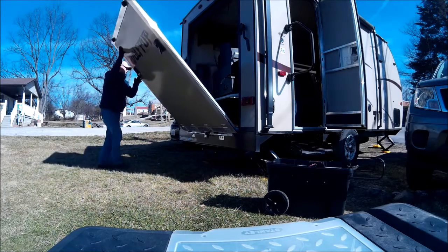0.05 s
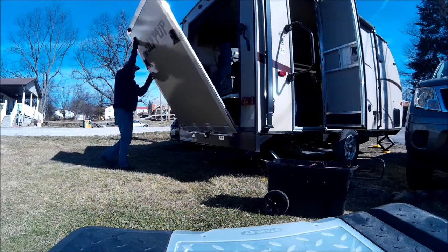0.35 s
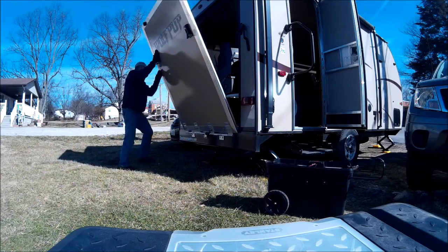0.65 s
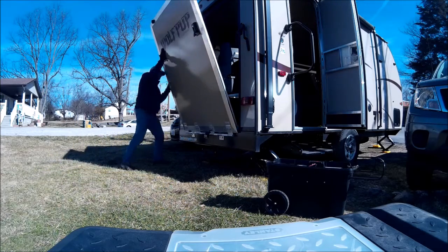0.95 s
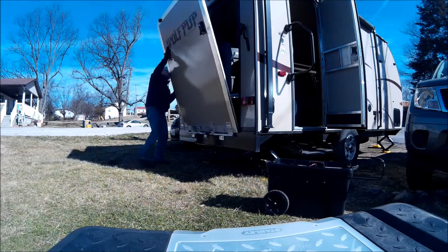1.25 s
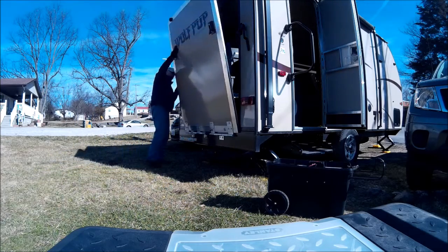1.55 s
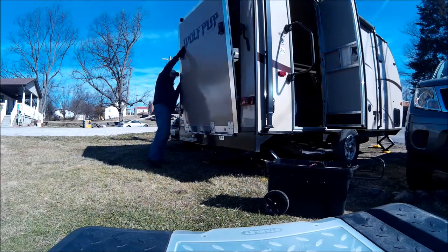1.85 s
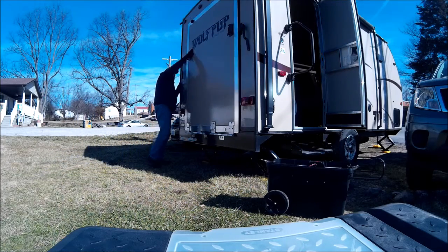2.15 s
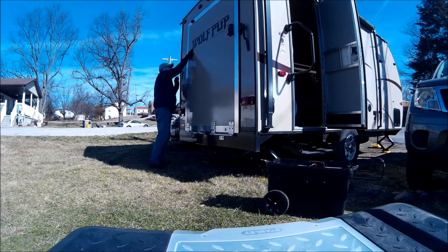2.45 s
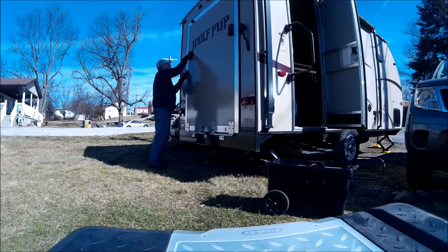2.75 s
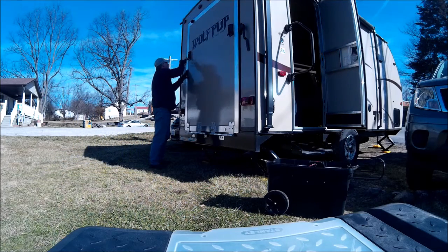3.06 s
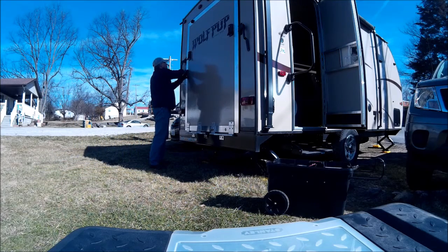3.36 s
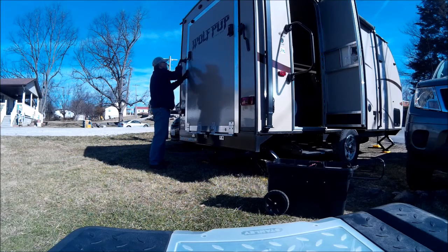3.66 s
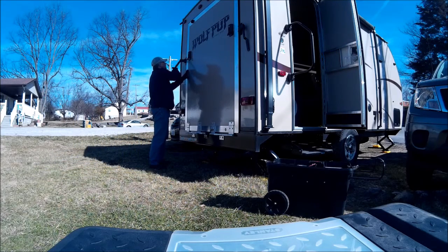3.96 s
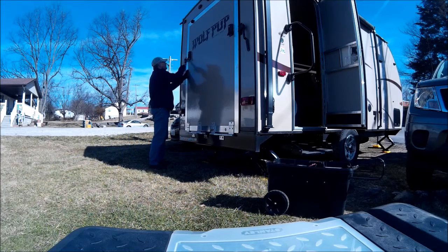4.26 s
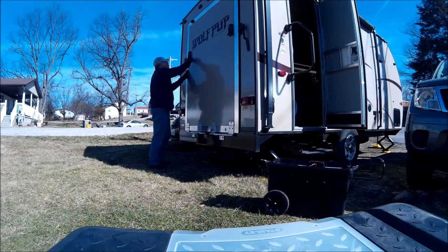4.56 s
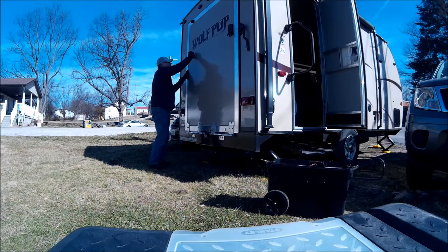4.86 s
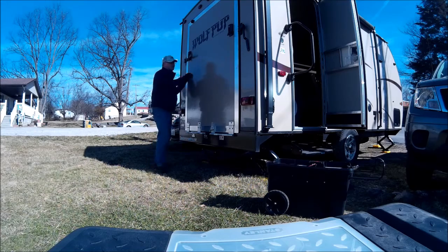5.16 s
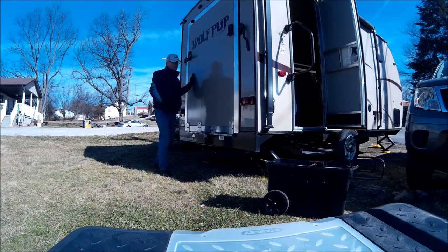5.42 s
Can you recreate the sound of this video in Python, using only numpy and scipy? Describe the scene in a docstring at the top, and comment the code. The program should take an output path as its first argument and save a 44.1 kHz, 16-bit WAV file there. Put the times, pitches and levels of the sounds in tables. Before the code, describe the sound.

Outdoors, a hinge pops, a heavy ramp door thuds shut, and after a few soft knocks a metal latch slams home.

```python
"""A faint distant rumble, then a hinge pops: on a lawn, a few metres from the microphone, a man is
pushing a travel trailer's rear ramp door shut. The hinge slips as the ramp rises. The ramp lands in
its frame, booming the hollow body, and rocks to rest while loose steel rattles. He knocks the latch
into place by hand, and its bar snaps over centre and slams home. The yard returns a scattered echo."""
import sys
import numpy as np
from scipy import signal
from scipy.fft import rfft, irfft
from scipy.io import wavfile

SR = 44100
rng = np.random.default_rng(int(sys.argv[2]) if len(sys.argv) > 2 else 0)


def store_pcm(level_fs):
    """Save levels as 16-bit WAV."""
    pcm = np.round(np.clip(level_fs, -1, 1) * 32767).astype(np.int16)
    wavfile.write(sys.argv[1], SR, np.atleast_2d(pcm).T)


N = 246519
RING_S = np.arange(int(.6 * SR)) / SR   # time axis of one ring
EDGES_HZ = np.geomspace(24, 17000, 29)
BANDS = [signal.butter(2, pair, "band", fs=SR, output="sos") for pair in zip(EDGES_HZ, EDGES_HZ[1:])]


def from_db(db):
    """Decibels to gain."""
    return 10 ** (np.asarray(db) / 20)


def at_hz(points, hz):
    """Read a table on a log-frequency axis."""
    table = np.array(points)
    return np.interp(np.log(hz), np.log(table[:, 0]), table[:, 1])


def add(track, s, sound):
    """Mix a sound into a track, starting at s seconds."""
    start = round(s * SR)
    track[start:start + len(sound)] += sound[:N - start]


def fade(t60):
    """Exponential decay from 1, down 60 dB after t60 seconds."""
    return np.exp(-np.log(1000) * RING_S / t60)


def soften(x, corner_hz):
    """A softer contact passes less treble."""
    return signal.sosfilt(signal.butter(2, min(corner_hz, SR * 4 / 9), fs=SR, output="sos"), x)


def dense_ring(colour, t60_table):
    """Countless overlapping modes struck at once, each band dying at its own rate."""
    centres = np.sqrt(EDGES_HZ[1:] * EDGES_HZ[:-1])
    gains = from_db(at_hz(colour, centres)) * np.sqrt(np.diff(EDGES_HZ))
    gains = gains / np.linalg.norm(gains)
    white = rng.standard_normal((2, len(RING_S) + SR // 10))
    out = 0
    for k, (hz, gain, t60) in enumerate(zip(centres, gains, at_hz(t60_table, centres))):
        decay = fade(t60) * np.minimum(2 * hz * RING_S, 1)   # each band rises in half a cycle
        ring = signal.sosfilt(BANDS[k], white[k % 2])[-len(RING_S):] * decay
        out = out + gain * ring * np.linalg.norm(decay) / np.linalg.norm(ring)
    return out


def clear_ring(modes, spread_db):
    """Strong single modes, neighbours in opposite phase; each blow shares its energy differently."""
    luck_db = spread_db * rng.standard_normal(len(modes))
    return sum((-1) ** k * from_db(db + luck_db[k]) * fade(t60) * np.sin(2 * np.pi * hz * RING_S)
               for k, (hz, db, t60) in enumerate(modes))


# The background out on the lawn. Each row: frequency in Hz, relative spectral density in dB.
AIR_COLOUR = [(12, -31.5), (20, -10.5), (59, -0.5), (87, -6.5), (119, 0.5), (191, -2.5), (207, -8.5),
              (238, -1.5), (266, -10), (306, -10), (597, -16.5), (705, -18), (2840, -27), (13500, -28.5),
              (15500, -31.5)]

def open_air(level_db=-57):
    """Steady far-off rumble under the microphone's hiss."""
    hz = np.maximum(np.fft.rfftfreq(N, 1 / SR), 1)
    noise = irfft(rfft(rng.standard_normal(N)) * from_db(at_hz(AIR_COLOUR, hz)), N)
    return from_db(level_db) * noise / np.sqrt(np.mean(noise ** 2))


# The hinge slipping as the ramp rises. Each row: start in seconds, level in dB, brightness in Hz.
HINGE_SLIPS = [(.436, -32, 4200), (1.095, -41.5, 800), (1.196, -48, 750), (1.231, -45.5, 750)]

def hinge_knocks(click_db=-5.5, click_brightening=1.93, lag_s=.008, flex_db=-14):
    """Each slip knocks the panel twice: a light, brighter click, then the ramp's weight."""
    clicks = [(s, db + click_db, hz * click_brightening, flex_db) for s, db, hz in HINGE_SLIPS]
    weight = [(s + lag_s, db, hz, flex_db) for s, db, hz in HINGE_SLIPS]
    return clicks + weight


# Loose steel fittings on the ramp. Each row: frequency in Hz, level in dB, t60 in seconds.
FITTING_MODES = [(1030, -12.5, 0.1), (1362, -3.5, 0.15), (1447, -7, 0.16), (1568, -1, 0.14),
                 (1680, -4.5, 0.12), (1787, -4.5, 0.14), (1920, -10, .16), (2530, -15.5, .14)]

def fitting_clank(knock_db, bright_hz, level_db=-7.5, full_hz=1730, db_per_octave=12, usual_db=-41):
    """The fittings ring, relative to the knock; harder contacts jar them more, up to a limit."""
    softness_db = db_per_octave * min(np.log2(bright_hz / full_hz), 0)
    lag_db = .16 * (knock_db - usual_db)   # being loose, they do not keep up with the knock's force
    return from_db(level_db + softness_db - lag_db) * clear_ring(FITTING_MODES, spread_db=.5)


# The panel's dense ring and its low flexing. Each row: frequency in Hz, relative spectral density in dB.
PANEL_COLOUR = [(90, -15), (180, -4.5), (340, 0), (430, 0.5), (560, 3.5), (850, -11.5), (1150, -8.5),
                (1550, -6.5), (2200, -16.5), (4000, -24.5), (6500, -18.5), (12000, -37)]
FLEX_COLOUR = [(60, -12.5), (110, 3), (150, 9.5), (200, -6), (330, -21), (700, -36.5), (4000, -95)]
# How long the panel rings. Each row: frequency in Hz, t60 in seconds.
PANEL_T60 = [(100, 0.29), (450, 0.23), (1500, 0.27), (4000, 0.25), (10000, 0.064)]
# The clear notes of the ramp's skin. Each row: frequency in Hz, level in dB, t60 in seconds.
SKIN_MODES = [(286, -14, .16), (357.4, -4, 0.22), (395.6, 0, 0.1), (448, 0, .17), (505.7, 4, 0.2),
              (570, 0, .17), (634, -3.5, .18), (696.3, -0.5, 0.15), (780, -4, 0.18), (1046, -8, 0.11),
              (1172, -9.5, 0.19), (1400, -8, 0.056), (1571, -5, 0.17), (1702, -8.5, 0.11),
              (2105, -10, 0.074), (2413, -12.5, 0.18), (2780, -21, 0.26), (3060, -15, 0.21),
              (3463, -15, .19), (3580, -15, .19)]

def ramp_panel(knocks, strike_t60=.044):
    """Each knock strikes one spot, spreads over the skin, flexes the panel and jars the fittings."""
    out = np.zeros(N)
    for s, db, bright_hz, flex_db in knocks:
        strike = from_db(-3) * dense_ring(PANEL_COLOUR, [(1000, strike_t60)])
        skin = from_db(-1) * dense_ring(PANEL_COLOUR, PANEL_T60)
        skin += from_db(-15) * clear_ring(SKIN_MODES, spread_db=4)
        flex = from_db(flex_db - 7) * dense_ring(FLEX_COLOUR, PANEL_T60)
        clank = fitting_clank(db, bright_hz)
        add(out, s, from_db(db) * (soften(strike + skin, bright_hz) + flex + clank))
    return out


# Jolts to the hinge and latch hardware. Each row: start in seconds, first tick in dB, rattle in dB.
JOLTS = [(0.4367, -31.5, -50.5), (2.158, -34, -42), (4.633, -33, -41.5), (4.6532, -26, -33)]
# One bright tick of steel. Each row: frequency in Hz, relative spectral density in dB.
STEEL_COLOUR = [(400, -12.5), (1200, -0.5), (2600, 3.5), (4000, -5), (6500, 0), (8000, -17), (10200, -5),
                (12000, -25.5), (15000, -34)]

def steel_rattles(count=9, gap_s=.014, fade_db_per_s=105.5, t60=.028):
    """Each jolt gives loose steel one tick and an uneven, dying run of smaller ones."""
    ticks = []
    for s, tick_db, rattle_db in JOLTS:
        delays = gap_s * (np.arange(count) + rng.random(count))
        ticks.append((s, tick_db))
        ticks += [(s + delay, rattle_db - fade_db_per_s * delay) for delay in delays]
    out = np.zeros(N)
    for s, db in ticks:
        add(out, s, from_db(db) * dense_ring(STEEL_COLOUR, [(1000, t60)]))
    return out


# Echoes reaching the microphone from the trailer's side, houses and trees.
# Each row: delay in seconds, level in dB, t60 of the scatter in seconds.
YARD_ECHOES = [(.014, -24, 0.051), (.048, -20.5, .07), (.059, -19, 0.03), (.073, -23.5, 0.031),
               (.10, -37.5, 0.09), (.15, -41, .7)]

def yard_echo(x, low_hz=250, top_hz=6500):
    """Rough surfaces return smeared echoes with little bass or top."""
    response = np.zeros(N)
    for delay, db, t60 in YARD_ECHOES:
        scatter = rng.standard_normal(len(RING_S)) * fade(t60)
        add(response, delay, from_db(db) * scatter / np.linalg.norm(scatter))
    echoes = signal.fftconvolve(x, response[:SR])[:N]
    return signal.sosfilt(signal.butter(1, [low_hz, top_hz], "band", fs=SR, output="sos"), echoes)


def frame_touches(landing_s=2.155, rock_s=.2275, shudder_s=.0238, rocks=3):
    """The ramp lands in its frame and rocks to rest, shuddering one touch less each time."""
    return [(landing_s + rock * rock_s + touch * shudder_s, rock, touch)
            for rock in range(rocks) for touch in range(rocks - rock)]


def frame_knocks(landing_db=-29, landing_hz=3900, rock_loss_db=12, touch_loss_db=1.8):
    """Every touch on the frame knocks the panel; each rock is weaker, duller and more of a flexing."""
    knocks = []
    for s, rock, touch in frame_touches():
        db = landing_db - rock * rock_loss_db - touch * touch_loss_db
        seal_dulling = .55 ** (touch % 2)   # every other touch falls on the rubber seal alone
        bright_hz = landing_hz * .35 ** rock * .68 ** touch * seal_dulling
        flex_db = -.5 + 6 * rock
        knocks.append((s, db, bright_hz, flex_db))
    return knocks


SLAM_S, CHATTER_HZ = 4.6472, 2600   # when the latch bar slams home; brightness of its chatter
# The trailer's hollow body. Each row: frequency in Hz, level in dB, t60 in seconds.
BODY_MODES = [(29.8, -2.5, 0.65), (53, -16.5, .2), (84.5, -4.5, 0.27), (112, -7, .25), (134, -4.5, 0.18)]
# Its dense boom. Each row: frequency in Hz, relative spectral density in dB.
BODY_COLOUR = [(20, -8), (35, -4.5), (55, 1), (90, -1.5), (160, -5), (260, -10), (500, -30), (4000, -100)]

def body_boom(landing_db=-26, rock_loss_db=15.5, touch_loss_db=8, slam_db=-50.5):
    """The hollow trailer booms under the ramp's weight, and faintly when the latch slams."""
    thuds = [(s, landing_db - rock * rock_loss_db - touch * touch_loss_db)
             for s, rock, touch in frame_touches()]
    out = np.zeros(N)
    for s, db in thuds + [(SLAM_S, slam_db)]:
        boom = clear_ring(BODY_MODES, spread_db=2) + from_db(2) * dense_ring(BODY_COLOUR, PANEL_T60)
        add(out, s, from_db(db) * boom)
    return out


# A hand knocking the latch into place.
# Each row: start in seconds, level in dB, brightness in Hz, relative panel flex in dB.
HAND_KNOCKS = [(3.478, -40, 1870, -7), (3.501, -48.5, 1900, -12), (3.547, -47, 700, 3),
               (3.611, -42.5, 920, -5), (3.677, -54, 900, -1), (3.914, -47.5, 750, -7),
               (4.201, -49.5, 1450, -14), (4.453, -40, 2000, 7.5), (4.588, -41.5, 1100, 3.5)]

def latch_knocks(grip_lead_s=.031, grip_db=-60, grip_dulling=.7, slam_db=-35.5, slam_flex_db=5):
    """The hand takes hold lightly just before each knock; last, the bar's slam jolts the panel."""
    grips = [(s - grip_lead_s, grip_db, hz * grip_dulling, flex_db) for s, _, hz, flex_db in HAND_KNOCKS]
    return list(HAND_KNOCKS) + grips + [(SLAM_S, slam_db, CHATTER_HZ, slam_flex_db)]


# The latch bar camming over centre. Each row: start in seconds, level in dB, brightness in Hz.
CAM_BLOWS = [(4.6337, -18.5, 5500), (4.6374, -8.5, 1403)]
# The bar, quickly damped by its keeper. Each row: frequency in Hz, level in dB, t60 in seconds.
BAR_MODES = [(173, -13, 0.038), (329.6, -7, 0.039), (615, -3, 0.027), (1039, -11, 0.034), (1399, -2, 0.028),
             (1726, -14, 0.028), (2569, -3.5, 0.037), (5940, -5, 0.014), (6530, -4, 0.013),
             (8350, -11, 0.01)]
# Its crack and the skin's ring after it. Each row: frequency in Hz, relative spectral density in dB.
CRACK_COLOUR = [(130, -8.5), (300, 5.5), (750, 1.5), (1500, -2.5), (2600, -6), (4500, -17), (6200, -14.5),
                (7500, -23.5), (10000, -20.5), (12000, -38), (15000, -31.5)]
SKIN_COLOUR = [(90, -24.5), (220, -13.5), (370, 3.5), (600, 5), (900, -7), (1500, -10.5), (2000, -20.5),
               (3200, -13.5), (4500, -32), (6300, -29), (9000, -42.5), (14000, -55.5)]

def latch_snap(slam_db=1, slam_hz=14000, chatter_s=.00285, loss_db=6, crack_t60=.028, radiate_hz=105):
    """The bar cams over, slams home and chatters twice on its keeper; the ramp's skin rings on."""
    chatter = [(SLAM_S + k * chatter_s, slam_db - k * loss_db, CHATTER_HZ) for k in (1, 2)]
    out = np.zeros(N)
    for s, db, bright_hz in list(CAM_BLOWS) + [(SLAM_S, slam_db, slam_hz)] + chatter:
        crack = from_db(-9) * dense_ring(CRACK_COLOUR, [(1000, crack_t60)])
        bar = from_db(-10) * clear_ring(BAR_MODES, spread_db=1.8)
        skin = from_db(-22) * clear_ring(SKIN_MODES, spread_db=.5)
        skin += from_db(-16) * dense_ring(SKIN_COLOUR, PANEL_T60)
        add(out, s, from_db(db) * soften(crack + bar + skin, bright_hz))
    # a small patch of wall radiates little bass
    return signal.sosfilt(signal.butter(2, radiate_hz, "high", fs=SR, output="sos"), out)


def scene(port_hz=12200):
    """Door and echo reach the microphone port, which passes little top; open air lies behind."""
    knocks = hinge_knocks() + frame_knocks() + latch_knocks()
    door = ramp_panel(knocks) + body_boom() + steel_rattles() + latch_snap()
    port = signal.cheby1(N=3, rp=.5, Wn=port_hz, fs=SR, output="sos")
    return (signal.sosfilt(port, door + yard_echo(door)) + open_air())[None]


def record(dry, low_hz=20, ceiling=1.15, top_hz=15700):
    """The microphone drops the deepest bass, the loudest peak is rounded and the top is cut."""
    thinned = signal.sosfilt(signal.butter(2, low_hz, "high", fs=SR, output="sos"), dry)
    rounded = ceiling * np.tanh(thinned / ceiling)
    return signal.sosfilt(signal.ellip(10, .1, 70, top_hz, fs=SR, output="sos"), rounded)


dry = scene()
out = record(dry)
store_pcm(out)
```